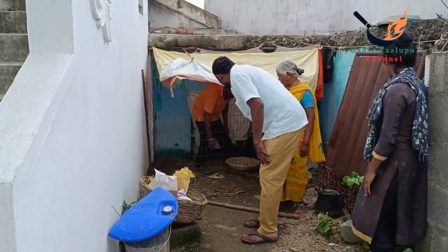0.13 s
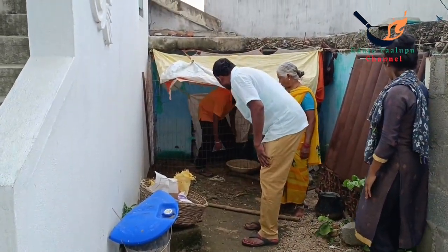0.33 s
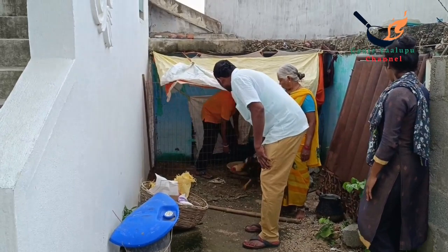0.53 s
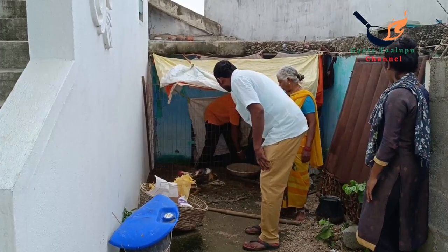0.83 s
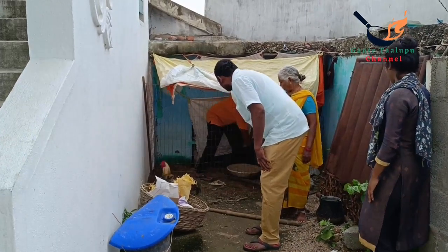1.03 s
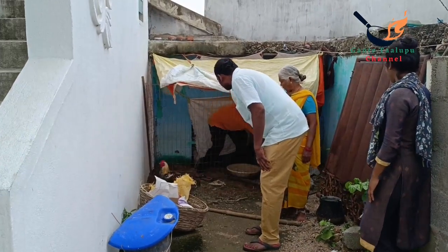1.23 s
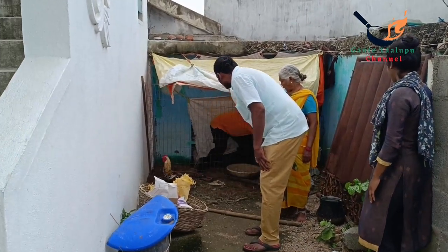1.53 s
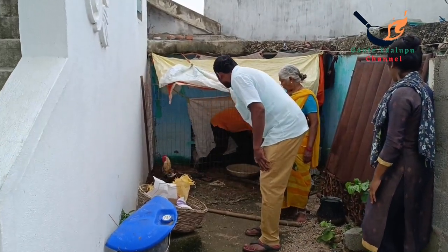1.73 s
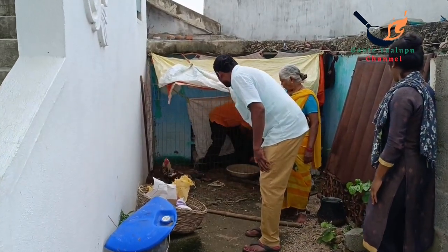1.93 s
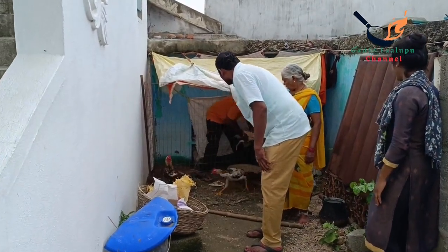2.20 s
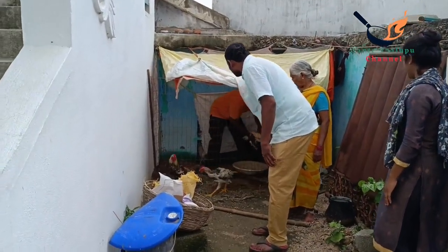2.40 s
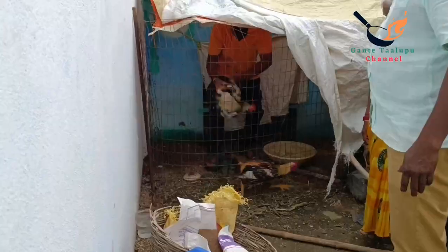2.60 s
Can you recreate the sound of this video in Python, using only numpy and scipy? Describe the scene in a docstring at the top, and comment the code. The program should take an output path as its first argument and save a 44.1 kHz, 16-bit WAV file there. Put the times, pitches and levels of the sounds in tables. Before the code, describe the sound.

Two chickens give short clucks and cackles, then loud rough squawks with brief wing beats

```python
"""Hens in a small coop

Short clucks and bright cackles of two hens, with harsh squawks from 1.5 to 2.4 s as one hen is caught and
further clucks and cackles around them; wings beat. Calls are pitch pulses and pulsed noise through throat
resonances, placed in the coop by random echoes. Faint peeps are gliding sines, a soft bump is four decaying
sines, wing beats are brief shaped noise. Light wind puffs, mostly on the right microphone port, a quiet yard
and a faint hiss that rises and falls are shaped noise."""
import sys
import numpy as np
from scipy import signal
from scipy.fft import rfft, irfft, next_fast_len
from scipy.io import wavfile
from scipy.ndimage import uniform_filter1d, minimum_filter1d, map_coordinates

SR = 44100
rng = np.random.default_rng(int(sys.argv[2]) if len(sys.argv) > 2 else 0)


def unload_wav(signal):
    """Save mono or channel-first audio to the path in sys.argv[1] as 16-bit WAV at rate SR, clipped to [-1, 1]."""
    wavfile.write(
        sys.argv[1],
        SR,
        np.round(np.clip(np.atleast_2d(signal).T, -1, 1) * 32767).astype(np.int16),
    )


def invert_db(level):
    """Linear amplitude ratio for a level in decibels (20 dB per decade), elementwise."""
    return 10 ** (np.asarray(level, dtype=float) / 20)


N = 121275


def unit(x):
    """Scale to rms 1."""
    return x / np.sqrt(np.mean(x ** 2) + 1e-20)


def along(points, hz):
    """Interpolate (Hz, value) points on a log frequency axis."""
    f, v = np.transpose(points)
    return np.interp(np.log(hz + 1), np.log(f + 1), v)


def timeline(points):
    """Interpolate (seconds, value) points over the whole scene."""
    s, v = np.transpose(points)
    return np.interp(np.arange(N) / SR, s, v)


def wobble(rate, size):
    """Smooth random curve, rate knots a second."""
    knots = rng.standard_normal(int(size * 600 / SR) + 4)
    return map_coordinates(knots, [np.arange(size) * min(rate, 599) / SR])


def filtered(x, response):
    """x times a complex response of frequency."""
    m = next_fast_len(x.shape[-1] + 4096)
    return irfft(rfft(x, m) * response(np.fft.rfftfreq(m, 1 / SR)), m)[..., :x.shape[-1]]


def shaped_noise(points, size):
    """Two independent channels of noise with a spectrum given in dB, rms 1."""
    return unit(filtered(rng.standard_normal((2, size)), lambda hz: invert_db(along(points, hz))))


def add(out, s, x):
    """Mix x into out from time s."""
    i = round(s * SR)
    x = x[..., max(-i, 0):N - i]
    out[..., max(i, 0):max(i, 0) + x.shape[-1]] += x


def tube(peaks, top_hz):
    """Causal response of a row of resonances, alternating in sign, between a low and a high edge."""
    low_hz = 191

    def response(f):
        u = f / top_hz
        treble_cut = 1 / (1 + np.sqrt(2) * 1j * u - u * u)
        bass_cut = 1 - 1 / (1 + 1j * f / low_hz)
        rings = 0
        for k, (center, width, db) in enumerate(peaks):
            band = 1j * f * width
            rings = rings + (-1) ** k * invert_db(db) * band / (center * center - f * f + band)
        return treble_cut ** 3 * bass_cut ** 3 * rings
    return response


VOICE_TOP_HZ, HISS_TOP_HZ = 3771, 12580
DRIFT, DRIFT_RATE_HZ = 0.01255, 61.04  # slow pitch drift
JITTER, JITTER_RATE_HZ = .07, 160  # pitch scatter at full roughness
SHIMMER_DB, SHIMMER_RATE_HZ = 8, 112.74  # pulse size scatter at full roughness
HISS_DB, GAPE_HISS_DB = -20.5, -15  # breath treble before roughness and beak scale it
# Breath resonances. Each row: center in Hz, width in Hz, level in dB.
BREATH = [(3932, 353, -0.5), (5225, 1060, -8), (6487, 720, -5), (9125, 1117, -4)]


def syrinx(hz, db, rough, beak, weak, shut, wide, chest, hiss_db):
    """Pulses at the pitch; roughness scatters them and adds noise gated each cycle; beak blends two throats."""
    n, rough, beak = len(db), np.clip(rough, 0, 1), np.clip(beak, 0, 1)
    drift = DRIFT * wobble(DRIFT_RATE_HZ, n)
    jitter = JITTER * rough * wobble(JITTER_RATE_HZ, n)
    turn = 2 * np.pi * np.cumsum(hz * (1 + drift + jitter)) / SR
    half_pitch = np.cos(turn / 2)
    pulses = unit(np.cos(np.arange(1, 15)[:, None] * turn).sum(0))
    pulses = pulses * (1 + np.clip(weak, 0, 1) * half_pitch)  # weakens alternate pulses
    pulses = pulses * invert_db(SHIMMER_DB * rough * wobble(SHIMMER_RATE_HZ, n))
    air = rng.standard_normal((2, n)) * (1 + np.cos(turn)) / 0.417
    source = np.sqrt(1 - rough ** 2) * pulses + rough * air[0]
    closed = unit(filtered(source, tube(shut, VOICE_TOP_HZ)))
    opened = unit(filtered(source, tube(wide, VOICE_TOP_HZ)))
    throat = np.sqrt(1 - beak) * closed + np.sqrt(beak) * opened
    hum = chest * weak * half_pitch
    breath = unit(filtered(air[1], tube(BREATH, HISS_TOP_HZ)))
    breath = invert_db(hiss_db) * (0.768 + rough) * beak * breath
    return invert_db(db) * (throat + hum + breath)


WALLS_DB, TAIL_DB = -3, -12.5  # early echoes and late ring before the room is normalized
LAG_S = 0.00023  # center of the scattered left-right echo delay
ALIKE_HZ = 800  # ports share the ring below this
SPLAY_RAD = 0.8443  # opposite phase shift of each port in the upper range
# Ring time. Each row: frequency in Hz, 60 dB decay time in s.
RING_TIME = [(250, 0.938), (1000, 0.418), (3000, 0.325), (9000, 0.2244)]


def coop(x):
    """Direct sound, six wall echoes with left-right delays and a fading ring; ports part in phase higher up."""
    hz, t, z = signal.stft(rng.standard_normal((2, SR // 2)), SR, nperseg=256)
    alike = 1 / (1 + (hz[:, None] / ALIKE_HZ) ** 4)
    z = np.array([z[0], np.sqrt(alike) * z[0] + np.sqrt(1 - alike) * z[1]])
    decay = invert_db(-60 * t / along(RING_TIME, hz)[:, None])
    tail = signal.istft(z * decay, SR, nperseg=256)[1]
    fade_in = np.clip(np.arange(tail.shape[1]) / (0.0202 * SR), 0, 1)
    room = invert_db(TAIL_DB) * tail / np.linalg.norm(tail[0]) * fade_in
    when = rng.uniform(.002, .014, 7)
    size = invert_db(WALLS_DB) * rng.normal(0, .41, 7)
    lag = LAG_S * (1 + .6 * rng.standard_normal(7)) * rng.choice([-1, 1], 7)
    lag = np.clip(lag, -.0018, .0018) / 2
    when[0], size[0], lag[0] = .001, 1, 0  # direct sound
    np.add.at(room[0], ((when + lag) * SR).astype(int), size)
    np.add.at(room[1], ((when - lag) * SR).astype(int), size)
    lead = SPLAY_RAD * rng.choice([-1, 1]) * np.array([[1], [-1]])
    room = filtered(room, lambda f: np.exp(1j * lead / (1 + (ALIKE_HZ / (f + 1)) ** 4)))
    room = room / np.linalg.norm(room, axis=1, keepdims=True)
    return signal.fftconvolve(x[None], room, axes=1)


SWELL_SHARE, SWELL_POWER = 0.5644, 0.695  # share of a call spent swelling, curve of the swell
RELEASE_S, CHEST_DB = 0.01348, -14  # fade time constant; half-pitch hum before weakening scales it


def swelling_calls(calls, rise, shut, wide, hiss_db):
    """Each call swells as the beak opens, fades fast and glides up, passing its set pitch at 70 %."""
    out = np.zeros((2, N))
    for s, length, db, hz, rough, beak, weak in calls:
        t = np.arange(round((length + .08) * SR)) / SR
        swell = np.clip(t / (SWELL_SHARE * length), 1e-3, 1) ** SWELL_POWER
        swell = swell * np.exp(-np.clip(t - length, 0, 1) / RELEASE_S)
        glide = hz * (1 + rise * (np.clip(t / length, 0, 1) - .7))
        level_db = db + 20 * np.log10(swell)
        opening = beak * np.sqrt(swell)
        voice = syrinx(glide, level_db, rough, opening, weak, shut, wide, invert_db(CHEST_DB), hiss_db)
        add(out, s, coop(voice))
    return out


# Throat, beak closed and gaping. Each row: center in Hz, width in Hz, level in dB.
CLOSED_THROAT = [(280, 59, -5.5), (620, 208, -4.5), (914, 239, 0.5)]
GAPING_THROAT = [(1980, 435, 5.7), (2841, 608, 0.72)]
# Each row: start in seconds, length in s, level in dB, pitch in Hz, roughness 0-1, beak open 0-1,
# weakening of alternate pulses 0-1.
CLUCK_CALLS = [(-.02, 0.0337, -26, 441.3, 0.37, 0, 0.22), (0.181, 0.0281, -24.5, 291.4, 0.25, 0, 0.21),
               (.341, 0.0311, -22.5, 497, 0.27, 0.52, 0.39), (.647, 0.0419, -16.5, 491.6, 0.38, 0.43, 0.5),
               (0.823, 0.0425, -15, 481, 0.48, 0.26, 0.27), (1.178, 0.0295, -18.5, 280, 0.3, 0.01, 0.02),
               (1.5, 0.03, -17, 287.8, 0.5, 0.54, 0.3), (1.9, 0.243, -41, 450, 0.49, 0, 0),
               (2.185, 0.04176, -14.5, 480.7, 0.6, 0.17, 0.69), (2.272, 0.00796, -14.5, 491, 0.42, 0.62, 0)]


def clucks():
    """Short clucks and one long, very faint low murmur; a closed throat blends toward a gaping one."""
    return swelling_calls(CLUCK_CALLS, 0.06155, CLOSED_THROAT, GAPING_THROAT, GAPE_HISS_DB)


# Each row: time in seconds, level in dB before the port offsets.
WIND_LEVEL = [(0, -55.5), (.21, -66.5), (0.258, -35.5), (.31, -52), (0.701, -53.5), (0.736, -33),
              (.78, -48.5), (.82, -38.5), (0.901, -27.5), (.94, -51), (0.979, -33), (1.02, -49),
              (1.149, -59.5), (1.19, -39), (1.231, -69.5), (1.58, -48), (1.741, -43), (1.8, -55),
              (2.43, -57), (2.75, -44.5)]
# Spectrum shape. Each row: frequency in Hz, density in dB.
WIND_SPECTRUM = [(15, -46.5), (40, -1.5), (80, -1), (150, -9), (300, -16.5), (600, -96.5)]


def wind():
    """Lumpy low noise, far stronger on the right port."""
    lumps = invert_db([4 * wobble(25.44, N), 4 * wobble(24.848, N)])
    rumble = unit(lumps * shaped_noise(WIND_SPECTRUM, N))
    port_db = [[-12], [5]]
    return invert_db(timeline(WIND_LEVEL) + port_db) * rumble


# Spectrum shape. Each row: frequency in Hz, density in dB.
YARD_SPECTRUM = [(15, -35), (25, 10.5), (306, -7), (390, 2.5), (898, -16), (1310, -4), (1860, -7),
                 (3840, -27), (9090, -27.5), (15600, -50.5)]


def yard():
    """Quiet background noise with a slight level drift."""
    return invert_db(-49.5 + 0.83 * wobble(8.5, N)) * shaped_noise(YARD_SPECTRUM, N)


# Each row: time in seconds, level in dB before flutter.
HISS_LEVEL = [(0, -60.5), (.6, -51), (1.02, -60.5), (1.041, -49.5), (1.16, -53.5), (1.24, -50), (1.45, -74),
              (1.97, -53.5), (2.45, -48.5), (2.72, -64.5)]
# Spectrum shape. Each row: frequency in Hz, density in dB.
HISS_SPECTRUM = [(300, -10), (2500, -5), (12000, -16.5), (15700, -24.5)]


def hiss():
    """Faint broadband hiss whose level rises and falls."""
    flutter_db = 5.15 * wobble(31.863, N)
    return invert_db(timeline(HISS_LEVEL) + flutter_db) * shaped_noise(HISS_SPECTRUM, N)


# Each row: start in seconds, length in s, level in dB, start pitch in Hz, end pitch in Hz.
PEEP_CALLS = [(.035, .1, -52, 2250, 2750), (.295, .05, -41, 1950, 1600), (.56, .07, -42, 2100, 2150)]


def peeps():
    """Faint distant peeps: gliding sines with slight pitch wobble under a half-sine envelope."""
    out = np.zeros((2, N))
    for s, length, db, start_hz, end_hz in PEEP_CALLS:
        u = np.linspace(0, 1, round(length * SR))
        hz = (start_hz + (end_hz - start_hz) * u) * (1 + 0.0096 * wobble(137, len(u)))
        whistle = np.sin(2 * np.pi * np.cumsum(hz) / SR)
        add(out, s, coop(invert_db(db) * np.sin(np.pi * u) * whistle))
    return out


# Each row: start in seconds, level in dB before the envelope.
WING_BEATS = [(0.4356, -50), (0.4835, -42), (0.6089, -36), (0.8161, -43), (1.4, -37), (1.443, -30),
              (1.7393, -38)]
# Spectrum shape. Each row: frequency in Hz, density in dB.
FEATHER_SPECTRUM = [(880, -48.5), (1500, -23.5), (2150, -16), (3090, -27), (3610, -27.5), (4610, -28.5),
                    (15500, -40.5)]


def wings():
    """Swishes of feathers: shaped noise with a fast rise and exponential fall."""
    rise_s, fall_s = 0.00047, 0.055
    out, t = np.zeros((2, N)), np.arange(round(.1 * SR)) / SR
    envelope = (1 - np.exp(-t / rise_s)) * np.exp(-t / fall_s)
    for s, db in WING_BEATS:
        add(out, s, invert_db(db) * shaped_noise(FEATHER_SPECTRUM, len(t)) * envelope)
    return out


# Throat, beak narrow and open. Each row: center in Hz, width in Hz, level in dB.
NARROW_THROAT = [(883, 273.3, 5.5), (1245, 565, 0)]
OPEN_THROAT = [(700, 238, -11.5), (1387.3, 315.2, 6.5), (1793.5, 784, 3.5), (3111, 588, -2.5)]
# Each row: start in seconds, length in s, level in dB, pitch in Hz, roughness 0-1, beak open 0-1,
# weakening of alternate pulses 0-1.
CACKLE_CALLS = [(.497, 0.0442, -20.5, 525.5, 0.546, 0.889, 0.512),
                (1.262, 0.0544, -24, 514.7, 0.312, 0.955, 0.256),
                (1.325, 0.0996, -27, 583.3, 0.436, 0.693, 0.33),
                (1.44, 0.0484, -25.5, 544.8, 0.38, 0.71, 0.38),
                (2.46, 0.1, -25.5, 613.7, 0.264, 0.645, 0.142),
                (2.56, 0.0323, -13, 535.2, 0.402, 0.465, 0.49),
                (2.6, 0.0335, -19, 548.6, 0.253, 0.36, 0.239),
                (2.636, 0.0226, -22, 608.2, 0.232, 0.55, 0.062),
                (2.735, 0.0168, -28.5, 534.2, 0.23, 1, 0.126)]


def cackles():
    """Bright calls of a second hen; a narrow throat blends toward an open one."""
    return swelling_calls(CACKLE_CALLS, 0.0217, NARROW_THROAT, OPEN_THROAT, HISS_DB)


# Each row: frequency in Hz, level in dB relative to the bump, 60 dB decay time in s.
BUMP_MODES = [(215.8, -1.5, 0.064), (339, 0, 0.0602), (616.8, 8, 0.0428), (1193, 12.5, 0.0133)]


def bump():
    """Soft bump on the coop: decaying sines with a rounded onset."""
    start_s, level_db, rise_s = 1.402, -17, 0.006
    out, t = np.zeros((2, N)), np.arange(round(.1 * SR)) / SR
    ring = sum(invert_db(db - 60 * t / t60) * np.sin(2 * np.pi * hz * t) for hz, db, t60 in BUMP_MODES)
    add(out, start_s, coop(invert_db(level_db) * ring * (1 - np.exp(-t / rise_s))))
    return out


# One list per squawk. Each row: time in seconds, pitch in Hz, level in dB, roughness 0-1, beak open 0-1.
SQUAWK_CURVES = [
    [(1.475, 668.7, -58.5, 0.16, 0.53), (1.49, 682.3, -14.5, 0.07, 0.54), (1.508, 714.4, -12.5, 0.26, 0.65),
     (1.528, 854.5, -12.5, 0.56, 0.89), (1.56, 876.5, -11, 0.41, 1), (1.59, 708.5, -12, 0.49, 1),
     (1.66, 700, -15, 0.57, 1), (1.695, 656.3, -19.5, 0.43, 1), (1.715, 578, -27.5, 0.54, 0.59)],
    [(1.8, 651.9, -26.5, 0.54, 0.72), (1.818, 686.3, -17.5, 0.27, 1), (1.85, 646.7, -10.5, 0.71, 1),
     (1.876, 653.9, -13.5, 0.28, 1), (1.9, 621.6, -21, 0.35, 0.83), (1.925, 603, -36.5, 0.33, 0.34)],
    [(1.985, 620, -31.5, 0.2, 0), (2.003, 650.3, -19, 0.28, 0.81), (2.022, 679.3, -13.5, 0, 0.91),
     (2.05, 671.9, -16.5, 0.13, 0.99), (2.082, 691.9, -13, 0.14, 0.95), (2.105, 740.9, -10.5, 0.11, 1),
     (2.122, 671.7, -19, 0.77, 0.67), (2.14, 652, -34.5, 0.55, 0.4)],
    [(2.255, 632.8, -19, 0.15, 0.39), (2.277, 691.3, -12.5, 0.31, 0.01), (2.288, 623.4, -5, 0.11, 0.78),
     (2.302, 632.8, -5, 0.18, 0.83), (2.312, 644, -30.5, 0.24, 0.7)],
    [(2.288, 800, -16.5, 0.07, 0.39), (2.3, 863.8, -6.5, 0, 0.07), (2.322, 847.4, -6, 0.06, 0.4),
     (2.337, 772.9, -16.5, 0.39, 0.89), (2.355, 715, -4.5, 0.42, 0.56), (2.39, 688.9, -7.5, 0.54, 0.7),
     (2.415, 669.1, -14, 0.2, 0.37), (2.44, 655.5, -30.5, 0.48, 0)],
]


def squawks():
    """Long harsh calls follow their curves; the last two blend toward the gaping throat."""
    out = np.zeros((2, N))
    for i, rows in enumerate(SQUAWK_CURVES):
        wide, hiss_db = (OPEN_THROAT, HISS_DB) if i < 3 else (GAPING_THROAT, GAPE_HISS_DB)
        s, *cols = np.transpose(rows)
        t = s[0] + np.arange(round(.28 * SR)) / SR
        hz, db, rough, beak = [np.interp(t, s, c) for c in cols]
        db = db - 2000 * np.clip(t - s[-1], 0, 1)  # 2 dB per ms after the last row
        voice = syrinx(hz, db, rough, beak, 0.218 * rough, NARROW_THROAT, wide, 0, hiss_db)
        add(out, s[0], coop(voice))
    return out


def scene():
    """Sum of all sources."""
    calls = clucks() + peeps() + cackles() + squawks()
    return calls + wind() + yard() + hiss() + wings() + bump()


def low_pass(x):
    """Removes everything above the highest recorded frequency."""
    return signal.sosfilt(signal.butter(12, 15730, fs=SR, output="sos"), x)


# Each row: frequency in Hz, right port level minus left in dB.
PORT_DIFFERENCE = [(5000, -1), (8500, 3), (12000, 1.5)]


def record(dry):
    """The right port is brighter in the treble; a look-ahead limiter holds the peaks."""
    ports = filtered(dry, lambda hz: invert_db(along(PORT_DIFFERENCE, hz) * np.array([[-.5], [.5]])))
    need = np.minimum(1, .88 / (np.abs(ports).max(0) + 1e-9))
    gain = uniform_filter1d(minimum_filter1d(need, size=441), size=221)
    return low_pass(ports * gain)


dry = scene()
out = record(dry)
unload_wav(out)
```